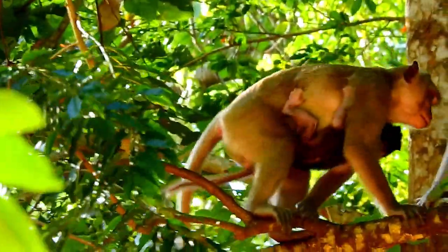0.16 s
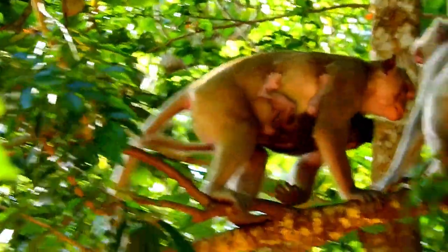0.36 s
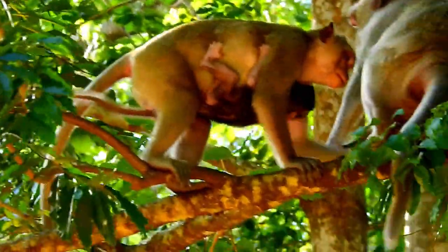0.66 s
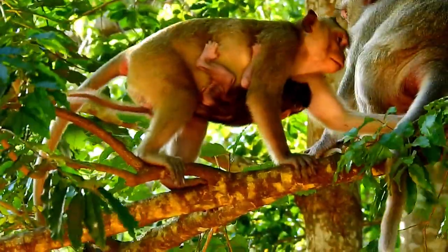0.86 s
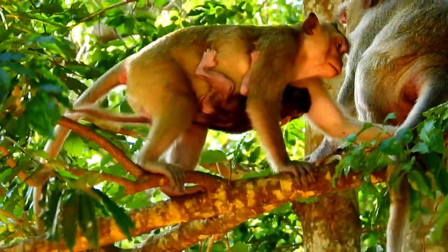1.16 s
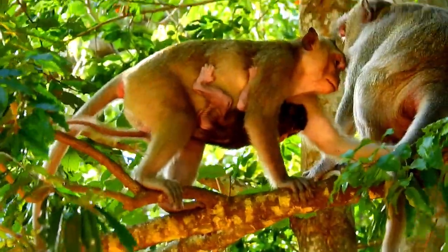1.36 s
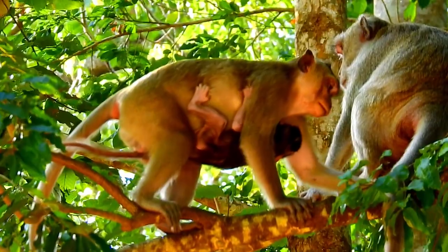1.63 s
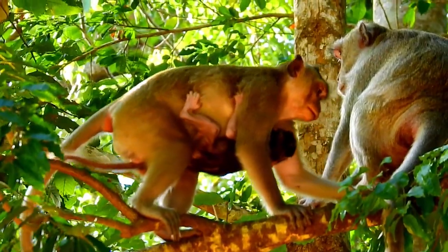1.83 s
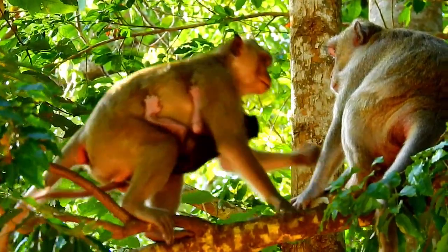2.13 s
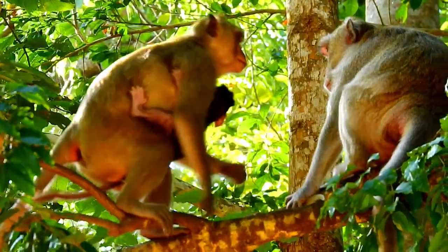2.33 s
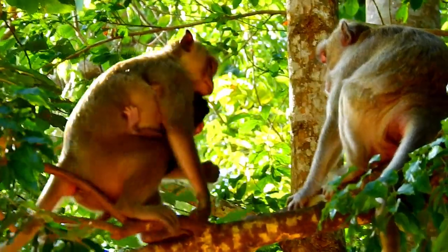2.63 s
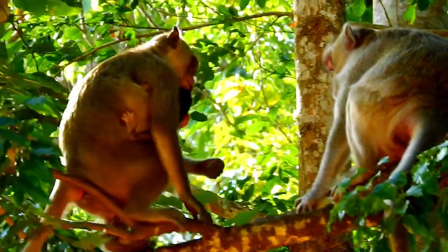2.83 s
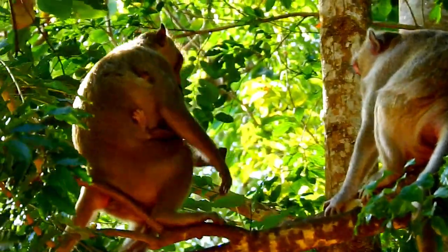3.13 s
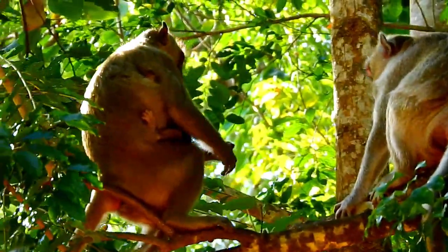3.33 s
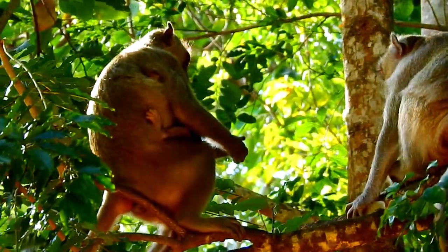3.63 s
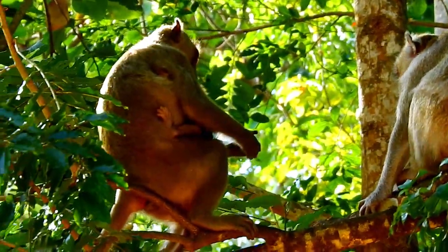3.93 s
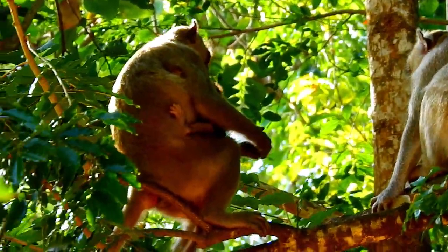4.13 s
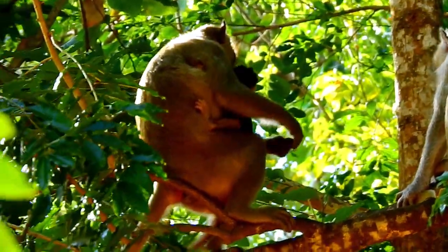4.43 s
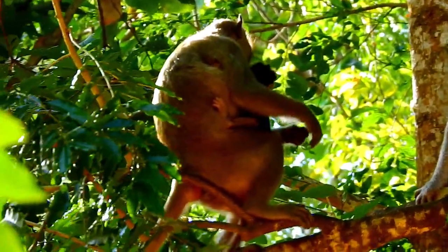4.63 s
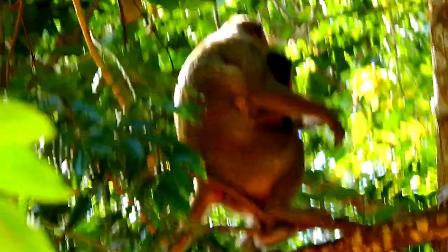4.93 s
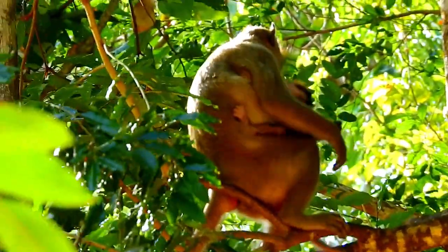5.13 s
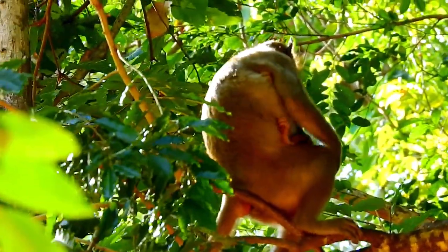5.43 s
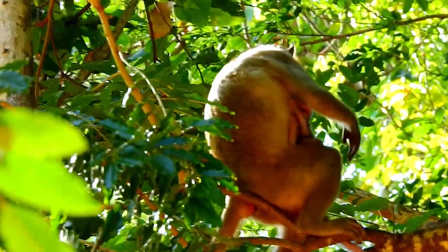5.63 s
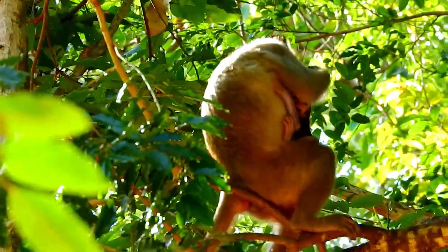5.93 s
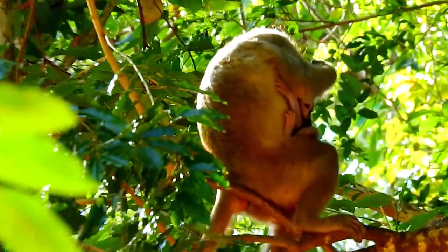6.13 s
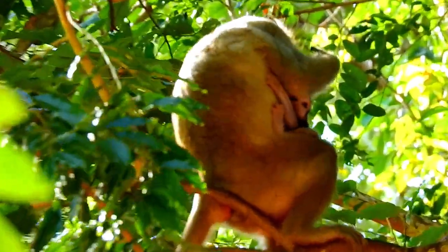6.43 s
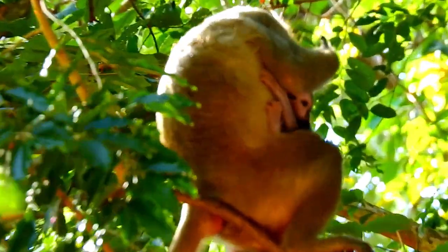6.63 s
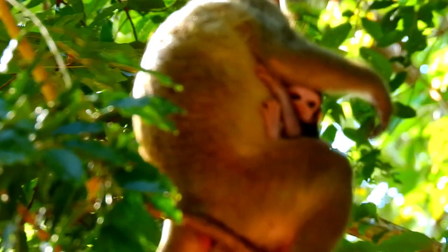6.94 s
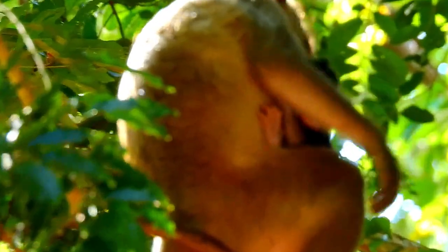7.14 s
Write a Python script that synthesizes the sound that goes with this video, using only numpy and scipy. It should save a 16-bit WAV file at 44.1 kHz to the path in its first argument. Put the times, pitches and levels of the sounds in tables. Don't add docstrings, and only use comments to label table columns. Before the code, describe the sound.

A distant camera microphone hears monkeys in tall trees, over faint airy hiss, occasional leaf rustle and soft ground thuds. Brief high whistles open the scene, with faint squeaks and a branch shake around 0.7 s. Near 1.1 s come sharper squeaks, then a rapid trill of seven rising chirps, fading by 1.65 s. Weak grumbling squeals follow; a crisp insect tick snaps at 2.15 s, and a hoarse squeal at 2.4 s. More ticks and thin whistles scatter from 2.7 to 3.7 s. Bright whistles cluster around 4 s, over a faint low coo, then squeaks at 4.3 s and a higher rising coo at 4.45 s. After a tick at 4.9 s, the nearest infant screams piercingly from 4.95 to 5.4 s, cracking and hissing, and again at 5.7 s. Calls then thin out, with low twig knocks at 6.2 and 6.3 s and gentle rustling. Fresh whistles close from 7.1 s. Every call leaves a short woody echo.

```python
import sys
import numpy as np
from scipy import signal
from scipy.fft import rfft, irfft
from scipy.io import wavfile
from scipy.ndimage import uniform_filter1d

SR = 44100
rng = np.random.default_rng(int(sys.argv[2]) if len(sys.argv) > 2 else 0)


def amp(db):
    return 10 ** (np.asarray(db, float) / 20)


def write(x):
    x = np.atleast_2d(x).T
    wavfile.write(sys.argv[1], SR, np.round(np.clip(x, -1, 1) * 32767).astype(np.int16))


N = 321048

# (time [s], roughness [0-1])
CRACKING = [(4.945, .11), (5.06, .05), (5.1, .3), (5.2, .33), (5.23, .25), (5.25, .03), (5.385, .04),
            (5.41, .25), (5.685, .2), (5.7, .03), (5.83, .1)]
# (multiple of the pitch [ratio], level [dB])
TROOP_PARTIALS = [(1, 0.5), (1.57, -43), (2.1, -54)]
CLEAN, WORN, HOARSE = .04, .17, .34


def evened(x):
    return x / np.sqrt(np.mean(x ** 2) + 1e-20)


def read(points, hz):
    f, value = np.transpose(points)
    return np.interp(np.log(hz + 1), np.log(f + 1), value)


def highpass(x, order, hz):
    return signal.sosfilt(signal.butter(order, hz, "high", fs=SR, output="sos"), x)


def add(mix, s, sound, pan_db):
    part = mix[:, round(s * SR):][:, :len(sound)]
    part += sound[:part.shape[1]] * amp(np.array([[pan_db / 2], [-pan_db / 2]]))


def wobble(count, width):
    bell = signal.windows.gaussian(int(8 * width), width)
    wander = evened(signal.fftconvolve(rng.standard_normal(count), bell, "same"))
    return evened(np.tanh(wander))


def squeal(rows, partials):
    s, *columns = np.transpose(rows)
    t = np.arange(s[0], s[-1], 1 / SR)
    hz, level_db, rough = (uniform_filter1d(np.interp(t, s, c), 130) for c in columns)
    rough = np.clip(rough, 0, 1)
    quaver = .25 * rough * wobble(len(t), width=22)
    scatter = 0.526 * rough ** 2 * wobble(len(t), width=4.2)
    turns = np.cumsum(hz * (1 + quaver + scatter)) / SR
    tone = 0
    for k, db in partials:
        audible = np.clip((19000 - k * hz) / 2000, 0, 1)
        tone = tone + amp(db) * np.sin(2 * np.pi * k * turns) * audible
    flutter_db = (2.5 + 3 * rough) * wobble(len(t), width=60)
    from_ends = np.minimum(t - t[0], t[-1] - t)
    edge = np.sin(np.pi / 2 * np.clip(from_ends / .008, 0, 1)) ** 2
    return np.sqrt(2) * amp(level_db + flutter_db) * tone * edge


def call(start, length, db, first_hz, last_hz, kind):
    peak, glide, onset_db, ending_db, rough = kind
    if rough == WORN:
        db = db + 3
    peak_s = start + np.clip(peak, .05, .95) * length
    peak_hz = first_hz + glide * (last_hz - first_hz)
    return [(start, first_hz, db + onset_db, rough),
            (peak_s, peak_hz, db, rough),
            (start + length, last_hz, db + ending_db, rough + .1)]


def infant_screams():
    # (time [s], pitch [Hz], level [dB])
    arches = [
        [(4.948, 2315, -38), (4.972, 4437, -27.5), (4.988, 6530, -21.5), (5.008, 8610, -33),
         (5.05, 9400, -37.5), (5.09, 8880, -39), (5.13, 7500, -30.5), (5.17, 7440, -30), (5.205, 6370, -18.5)],
        [(5.195, 6256, -16.5), (5.236, 5600, -18), (5.256, 6820, -20.5), (5.276, 6970, -17.5),
         (5.297, 8350, -35), (5.352, 8630, -34.5), (5.372, 9330, -32), (5.398, 8000, -25.5), (5.416, 5530, -23)],
        [(5.682, 6200, -36), (5.693, 8310, -20.5), (5.705, 8880, -19.5), (5.727, 9650, -26.5),
         (5.752, 8400, -33), (5.763, 6890, -18), (5.78, 5880, -26), (5.81, 5286, -24.5), (5.838, 4400, -23)],
    ]
    overtones = [-44, -42, -24]
    # (start [s], length [s], peak level [dB], first pitch [Hz], last pitch [Hz])
    breaks = [(4.963, 0.02, -22.5, 3600, 5400), (5.19, 0.03, -26, 3800, 4000),
              (5.398, 0.026, -22, 3450, 5320), (5.683, .1, -33.5, 5650, 5800),
              (5.714, .018, -36, 5500, 4800), (5.815, .025, -32, 7300, 7200), (5.01, .09, -38, 8000, 8000),
              (5.1, .09, -49.5, 11000, 12000), (5.165, .02, -27, 8100, 7100),
              (5.687, 0.03, -22.5, 7400, 6600), (5.765, 0.03, -27, 7700, 6500),
              (5.783, 0.028, -23.5, 6700, 6100), (5.816, 0.022, -27, 3850, 3750),
              (5.0, .15, -32.5, 6500, 6550), (4.99, .14, -36.5, 4450, 4350), (5.03, .12, -37.5, 5600, 6100),
              (5.25, 0.2, -31, 5600, 5550), (5.2, .04, -34, 4000, 3800), (4.95, 0.024, -36.5, 3700, 3300),
              (4.945, .025, -42, 2000, 2900), (4.96, .09, -50, 2900, 2600), (4.96, .1, -55, 2150, 2100),
              (5.405, 0.02, -22, 4300, 4500), (4.968, .018, -22, 4350, 4500),
              (5.69, .065, -47, 12300, 13200), (5.688, .02, -40, 10200, 10800),
              (5.775, .04, -46, 11800, 11500), (5.72, .05, -37.5, 7000, 7000)]
    # (peak position [share of length], glide done by then [share],
    # onset level [dB], ending level [dB], roughness [0-1])
    break_kind = (.45, .5, -8, -12, .15)
    # (multiple of the pitch [ratio], level [dB])
    break_partials = [(1, 0), (2, -40)]
    near = np.zeros((2, N))
    for arch, overtone_db in zip(arches, overtones):
        rows = [(*row, np.interp(row[0], *np.transpose(CRACKING))) for row in arch]
        add(near, rows[0][0], squeal(rows, [(1, 0.00074), (2, overtone_db)]), .3)
    for row in breaks:
        add(near, row[0], squeal(call(*row, break_kind), break_partials), .3)
    return near


def rasp(whistle, db):
    # (frequency [Hz], level [dB])
    throat = [(2000, -40), (3700, -32), (4400, -8), (5000, -10), (6300, 0.5), (9000, -13), (11000, -17),
              (15500, -37)]
    strength = np.sqrt(np.abs(uniform_filter1d(whistle ** 2, 350)))
    colour = amp(read(throat, np.fft.rfftfreq(N, 1 / SR)))
    rush = evened(irfft(rfft(rng.standard_normal(N)) * colour, N))
    return amp(db + 3.5 * wobble(N, width=250)) * strength * rush


def leaking_air(near, hoarse):
    cracked = .07 + 3.5 * np.interp(np.arange(N) / SR, *np.transpose(CRACKING))
    return rasp(highpass(cracked * near + amp(-0.5) * hoarse, 2, 5000), db=-7.0)


def troop_whistles():
    # (start [s], length [s], peak level [dB], first pitch [Hz], last pitch [Hz])
    stabs = [(.475, 0.051, -80.5, 11300, 10970), (.71, .17, -81, 10540, 11070),
             (0.589, .08, -61.5, 6770, 6120), (6.114, 0.12, -45.5, 7930, 7914),
             (0, 0.065, -45.5, 7430, 7350), (0.868, 0.13, -52, 6850, 6890), (3.672, .012, -45, 7900, 7800),
             (2.438, .03, -34, 6300, 6600), (1.15, 0.031, -35, 6400, 6300),
             (1.172, 0.062, -39.5, 6300, 6200), (4.051, 0.13, -43.5, 6920, 7010),
             (4.314, 0.058, -50, 3920, 3540), (4.36, 0.034, -34.5, 2560, 2480),
             (7.123, .02, -42, 6500, 7100), (7.136, 0.15, -38, 7150, 7380)]
    # (start [s], length [s], peak level [dB], first pitch [Hz], last pitch [Hz])
    swells = [(2.947, 0.066, -38, 7280, 6760), (3.193, .12, -38, 6970, 6000),
              (3.977, 0.039, -27.5, 7960, 6790), (4.005, 0.045, -28, 6780, 7160),
              (4.045, 0.0203, -48, 7200, 8010), (4.31, 0.058, -37, 2260, 3370),
              (4.537, 0.11, -45.5, 6730, 7330), (6.091, 0.052, -45.5, 6790, 7900),
              (7.087, 0.081, -37.5, 6735, 5910)]
    # (start [s], length [s], peak level [dB], first pitch [Hz], last pitch [Hz])
    builds = [(1.099, 0.041, -42.5, 4830, 6120), (2.955, 0.06, -55.5, 8700, 7420),
              (3.965, 0.021, -35, 6550, 7950), (4.339, 0.032, -33, 1997, 2364),
              (4.815, .1, -34, 6830, 5720), (6.143, 0.048, -53.5, 2600, 1876),
              (6.317, 0.055, -52.5, 7750, 5990)]
    # (start [s], length [s], peak level [dB], first pitch [Hz], last pitch [Hz])
    dives = [(0.035, 0.023, -40.5, 7730, 5240), (0.752, 0.047, -45.5, 6660, 5170),
             (1.04, 0.035, -45, 7200, 4000), (1.616, 0.059, -49.5, 6970, 4910),
             (1.674, .04, -51.5, 4630, 3490), (6.702, .08, -58.5, 6330, 4950)]
    # (start [s], length [s], peak level [dB], first pitch [Hz], last pitch [Hz])
    cries = [(0, 0.077, -55.5, 8230, 8330), (1.513, 0.021, -62.5, 2450, 2390),
             (1.578, 0.093, -71, 2256, 2100), (1.709, 0.037, -62, 2346, 2390),
             (3.677, 0.044, -57.5, 3630, 3520), (2.441, 0.095, -40, 6470, 6360),
             (0, 0.027, -62.5, 2005, 1880), (0, 0.024, -65, 4420, 4300), (0.511, 0.073, -68, 4120, 5090),
             (0.531, 0.18, -64, 6540, 5910), (0.866, 0.13, -68.5, 8060, 8520),
             (1.825, 0.15, -45.5, 7050, 6690), (1.97, 0.14, -59.5, 6620, 6670),
             (2.427, 0.06, -51, 3800, 4050), (2.601, 0.14, -48, 7510, 7900), (1.136, .02, -47, 6180, 6500),
             (3.262, 0.081, -51, 6100, 5310), (3.315, 0.12, -43.5, 5490, 6190),
             (3.385, 0.15, -41, 6250, 7350), (4.085, 0.097, -55.5, 5430, 5310),
             (4.356, 0.071, -45.5, 4414, 4390), (4.358, .08, -46, 5360, 5016),
             (4.568, 0.15, -62.5, 8220, 7780), (5.97, 0.94, -68.5, 891, 954.7),
             (6.201, 0.85, -71.5, 6430, 5940), (6.741, .1, -63.5, 5680, 5415), (6.2, .5, -74, 2550, 2400),
             (6.7, .5, -70, 2450, 3000), (6.12, .2, -62, 7000, 7200), (7.149, 0.093, -57.5, 8280, 7800),
             (7.156, 0.14, -43, 6090, 5800)]
    # (start [s], length [s], peak level [dB], first pitch [Hz], last pitch [Hz])
    grumbles = [(1.698, 0.14, -60.5, 6580, 6860), (1.847, .14, -53.5, 6330, 6120),
                (2.159, .12, -57.5, 6800, 6500), (2.3, 0.14, -62.5, 6520, 6760),
                (3.399, .16, -54, 5930, 6320), (2.87, 0.137, -58, 2900, 2746),
                (3.161, .14, -61, 2904, 2900), (2.5, .2, -52, 4700, 4500), (0, .1, -68, 11300, 11500),
                (3.9, .2, -63, 2310, 2395)]
    # (start [s], length [s], peak level [dB], first pitch [Hz], last pitch [Hz])
    screeches = [(.94, 0.072, -75, 11020, 10970), (1.894, 0.035, -76, 8100, 8300),
                 (1.953, 0.38, -69.5, 5140, 5150), (2.1, 0.037, -53.5, 7000, 6100),
                 (2.394, 0.051, -47.5, 6980, 6800), (2.428, 0.075, -29, 6786, 6490),
                 (2.488, .2, -40, 6270, 5674), (3.098, 0.053, -52, 8340, 8220),
                 (3.378, 0.14, -52.5, 4750, 4880), (3.686, 0.067, -43.5, 8180, 7470),
                 (4.314, 0.1, -66.5, 9320, 8850)]
    # (peak position [share of length], glide done by then [share],
    # onset level [dB], ending level [dB], roughness [0-1])
    stab_kind = (0.47, 0.57, 0.12, -11, CLEAN)
    swell_kind = (0.7, 0.88, -15, -23, CLEAN)
    build_kind = (0.99, 0.94, -13.5, -1.5, CLEAN)
    dive_kind = (0.27, 0.1905, -16, -15, WORN)
    cry_kind = (0.55, 0.69, -5.5, -7, WORN)
    grumble_kind = (.4, .5, -5, -6, .23)
    screech_kind = (0.35, 0.31, -11.5, -11.5, HOARSE)
    # (time [s], left minus right [dB])
    caller_side = [(0.0, 4), (0.36, 11), (0.47, -10.5), (1.05, 24.5), (1.151, -17), (2.051, 11),
                   (5.961, -2), (6.489, 23), (7.28, 3.5)]
    far, hoarse = np.zeros((2, 2, N))
    for mix, rows, kind in [(far, stabs, stab_kind), (far, swells, swell_kind), (far, builds, build_kind),
                            (far, dives, dive_kind), (far, cries, cry_kind), (far, grumbles, grumble_kind),
                            (hoarse, screeches, screech_kind)]:
        for row in rows:
            side_db = np.interp(row[0], *np.transpose(caller_side))
            add(mix, row[0], squeal(call(*row, kind), TROOP_PARTIALS), side_db)
    return far, hoarse


def chirp(s, db, hz):
    # (time from the chirp's listed time [s], pitch factor, level [dB])
    shape = [(-.012, .76, -17), (0, .9, -6), (.01, 1.0, 0), (.019, 1.0, -7), (.028, .95, -18)]
    rows = [(s + dt, factor * hz, db + rel_db, .055) for dt, factor, rel_db in shape]
    return squeal(rows, TROOP_PARTIALS[:1])


def trill():
    # (time [s], level [dB], top pitch [Hz])
    chirps = [
        (1.2457, -35.5, 5530),
        (1.33, -42, 5504),
        (1.404, -42, 5246),
        (1.4696, -45.5, 5220),
        (1.5277, -42.5, 5280),
        (1.59, -42, 4870),
        (1.644, -48.5, 5100),
    ]
    sung = np.zeros((2, N))
    for s, db, hz in chirps:
        add(sung, s - .012, chirp(s, db, hz), 0)
    return sung


def coo(rows, mouth):
    s, hz, level_db = np.transpose(rows)
    t = np.arange(s[0], s[-1], 1 / SR)
    turns = np.cumsum(np.interp(t, s, hz) * (1 + 0.009 * wobble(len(t), width=200))) / SR
    voice = 0
    for k in range(1, 9):
        partial_db = read(mouth, k * hz.mean()) + 6 * wobble(len(t), width=200)
        voice = voice + amp(partial_db) * np.sin(2 * np.pi * k * turns)
    return amp(np.interp(t, s, level_db)) * evened(voice) * signal.windows.tukey(len(t), .1)


def soft_coos():
    # (time [s], pitch [Hz], level [dB])
    coo_lines = [
        [(3.86, 647, -57), (3.98, 639.5, -54.5), (4.12, 629, -55), (4.25, 632.5, -62)],
        [(4.43, 1410, -45.5), (4.51, 1436, -47.5), (4.67, 1509, -48.5), (4.79, 1530, -56)],
    ]
    # (frequency [Hz], level [dB])
    nasal_mouth = [(640, -50), (1300, -18), (1900, -3), (2550, 0), (3200, -2), (3850, -15), (4500, -11),
                   (5500, -40)]
    # (frequency [Hz], level [dB])
    round_mouth = [(900, 21), (1450, -9.5), (1900, 22), (2900, -12.5), (4400, -31), (6000, -61)]
    sung = np.zeros((2, N))
    for rows, mouth in zip(coo_lines, [nasal_mouth, round_mouth]):
        add(sung, rows[0][0], coo(rows, mouth), 0)
    return sung


def click(db, hz, t60, partners):
    t = np.arange(1500) / SR
    modes = [(0.97, 0.0018)] + partners
    ring = sum(amp(p_db) * np.sin(2 * np.pi * hz * ratio * t) for ratio, p_db in modes)
    return amp(db - 60 * t / t60) * ring * np.minimum(t / .0012, 1)


def ticks_and_knocks():
    # (time [s], peak level [dB], pitch [Hz])
    ticks = [(0.0213, -33, 7300), (0.286, -40, 6700), (0.3894, -55, 5950), (2.0767, -36, 6230),
             (2.1532, -17, 6500), (2.4106, -25, 6570), (2.728, -21, 7000), (3.0465, -27, 6870),
             (3.3603, -24, 6200), (3.059, -40, 6870), (3.8752, -21, 6370), (4.474, -47, 8600),
             (4.8944, -22, 6120), (2.196, -46, 6600), (2.142, -52, 4300), (2.418, -38, 6800),
             (4.795, -53, 7400)]
    # (time [s], peak level [dB], pitch [Hz])
    knocks = [(1.217, -51, 1050), (2.644, -58, 3000), (2.186, -56, 1730), (2.186, -58, 2800),
              (2.43, -53, 2000), (2.061, -45, 1000), (3.431, -49, 1016), (4.694, -44.5, 1770),
              (4.756, -41.5, 1345), (4.884, -44.5, 1980), (5.661, -39, 1070), (6.209, -31.5, 1276),
              (6.327, -35, 1120), (6.712, -43.5, 1056), (7.209, -40, 2030)]
    tick_modes = [(.68, -14), (1.15, -6.5), (1.35, -15), (1.55, -20), (1.75, -28), (1.95, -26)]
    knock_modes = [(.75, -6), (1.3, -4), (1.7, -7)]
    clicks = np.zeros((2, N))
    for s, db, hz in ticks:
        add(clicks, s, click(db - 1.5, hz, 0.0064, tick_modes), 5.0)
    for s, db, hz in knocks:
        add(clicks, s, click(db, hz, .026, knock_modes), 1.5)
    return clicks


def echo_tail(early_db):
    # (frequency [Hz], likeness [0-1])
    echo_same = [(1000, 0.94), (3000, 0.91), (5000, 0.52), (12000, 0.086)]
    # (frequency [Hz], time to fade by 60 dB [s])
    wood = [(1000, 0.45), (3500, 0.39), (6000, 0.46), (9000, 0.38), (14000, 0.33)]
    taps = np.zeros((2, SR))
    slots = np.arange(150, SR - 20, 20)
    at = slots + rng.integers(0, 20, (2, len(slots)))
    np.put_along_axis(taps, at, rng.choice([-1., 1.], at.shape), 1)
    hz, t, (left, other) = signal.stft(taps, SR, nperseg=256)
    same = np.clip(read(echo_same, hz), -1, 1)[:, None]
    right = same * left + np.sqrt(1 - same ** 2) * other
    decay = amp(-60 * t / read(wood, hz)[:, None]) * (1 + amp(early_db - 60 * t / .15))
    tail = signal.istft(np.array([left, right]) * decay, SR, nperseg=256)[1][:, :SR // 2]
    return tail / np.linalg.norm(tail[0])


def trunks(x, early_db):
    sway = 2 * np.pi * 16 * np.arange(N) / SR
    echoes = 0
    for wave in (np.sin, np.cos):
        sent = (x.mean(0) * wave(sway))[None]
        echoes = echoes + signal.fftconvolve(sent, echo_tail(early_db), axes=1)[:, :N]
    return echoes


def stirred(events, layer):
    calm_db, rise, fall = layer
    t = np.arange(0, N / SR + .02, .005)
    lift = 0
    for s, hold, db in events:
        before, after = np.maximum(s - t, 0), np.maximum(t - s - hold, 0)
        lift = lift + amp(db - rise * before - fall * after)
    return np.transpose([t, 20 * np.log10(amp(calm_db) + lift)])


def hiss(spectrum, curve, patchy_db, size=512):
    # (frequency [Hz], likeness [0-1])
    likeness = [(300, 0.97), (800, 0.84), (2400, 0.89), (4400, 0.13), (8000, 0.23)]
    frames, hz = 4 * N // size + 5, np.fft.rfftfreq(size, 1 / SR)
    a, b, c, d, patches = rng.standard_normal((frames, len(hz), 5)).T
    patches = evened(uniform_filter1d(uniform_filter1d(patches, 5, 0), 14, 1))
    same = np.clip(read(likeness, hz), -1, 1)[:, None]
    left = a + 1j * b
    right = same * left + np.sqrt(1 - same ** 2) * (c + 1j * d)
    z = np.array([left, right]) * amp(read(spectrum, hz)[:, None] + patchy_db * patches)
    sound = evened(signal.istft(z, nperseg=size, noverlap=3 * size // 4)[1][:, :N])
    return sound * amp(np.interp(np.arange(N) / SR, *np.transpose(curve)))


def shaken_branches():
    # (frequency [Hz], level per Hz [dB])
    leaves = [(410, -29), (700, -13.5), (989, -11), (1080, -6.5), (1540, -3), (2270, 4.5), (2980, 3),
              (4100, -5), (5000, -13.5), (6500, -42), (11000, -120)]
    # (start [s], hold [s], level [dB])
    shakes = [(.68, 0.25, -51), (1.65, 0.44, -74.5), (2.88, 0.37, -53), (3.9, 0.13, -53),
              (4.35, 0.5, -63.5), (5.19, 0.15, -48.5), (5.6, 0.47, -77), (6.1, 0.8, -69), (7.1, .2, -62.5)]
    # (calm level [dB], rise [dB per s], fall [dB per s])
    branch = (-86, 272, 70)
    return hiss(leaves, stirred(shakes, branch), patchy_db=2.5)


def stirred_undergrowth():
    # (frequency [Hz], level per Hz [dB])
    undergrowth = [(210, -49), (350, -18), (451, -30.5), (604, -13), (841, -12), (937, -9), (2200, -23.5),
                   (2860, -45.5), (4840, -120)]
    # (start [s], hold [s], level [dB])
    stirs = [(.7, 0.5, -80), (1.62, 0.5, -70), (2.5, .2, -75), (2.9, .6, -73), (3.9, .25, -70.5),
             (4.4, .45, -75), (5.15, .45, -72), (5.98, 0.85, -62.5), (7.2, 0.11, -62)]
    # (calm level [dB], rise [dB per s], fall [dB per s])
    brush = (-91, 150, 54)
    return hiss(undergrowth, stirred(stirs, brush), patchy_db=5.0)


def ground_thuds():
    # (frequency [Hz], level per Hz [dB])
    rumble = [(24, -54.5), (38, -14), (50, -3.5), (107, 2.5), (193, -3), (262, -10.5), (357, -11.5),
              (400, -14.5), (500, -20), (650, -19), (1100, -120)]
    # (start [s], hold [s], level [dB])
    thuds = [(0, 0.015, -66.5), (.66, 0.17, -62.5), (1.5, 0.082, -76), (1.93, 0.07, -52.5),
             (3.77, 0.059, -55), (6.0, 0.48, -75), (6.62, 0.25, -63.5)]
    # (calm level [dB], rise [dB per s], fall [dB per s])
    ground = (-70.5, 620, 89)
    return hiss(rumble, stirred(thuds, ground), patchy_db=2.0, size=4096)


def forest_air():
    # (frequency [Hz], level per Hz [dB])
    air = [(240, -43.5), (400, -8.5), (1100, -8), (1600, -9.5), (3460, -56), (4300, -24), (6380, -2.5),
           (7330, -3), (9080, -26), (14600, -22.5), (15500, -28.5)]
    return hiss(air, [(0, -77.5), (7.28, -77.5)], patchy_db=3.5)


def scene():
    near = infant_screams()
    far, hoarse = troop_whistles()
    far = far + trill() + soft_coos()
    clicks = ticks_and_knocks()
    near = highpass(near + leaking_air(near, hoarse), 2, 2000)
    far = far + highpass(hoarse, 6, 4500)
    echoes = amp(-2) * trunks(far + amp(-4) * clicks, early_db=5)
    echoes += amp(-3.5) * trunks(near, early_db=7.0)
    bed = shaken_branches() + stirred_undergrowth() + ground_thuds() + forest_air()
    return amp(-5.5) * far + amp(-3) * near + clicks + echoes + bed


def masked(x):
    hz, _, z = signal.stft(x, SR, nperseg=1024, noverlap=512)
    power = uniform_filter1d((abs(z) ** 2).mean(0), size=3, axis=1)
    band_db = 10 * np.log10(abs(power[:512]).reshape(32, 16, -1).mean(1) + 1e-20)
    slope_db = 1.7 * np.arange(32)[:, None]
    loudest_below = np.maximum.accumulate(band_db + slope_db, axis=0) - slope_db
    hidden = band_db < loudest_below - 37
    kept = 1 - np.repeat(hidden, 16, axis=0) * (hz[:512, None] > 7000)
    kept = np.vstack([kept, kept[-1:]])
    return signal.istft(z * kept, SR, nperseg=1024, noverlap=512)[1][:, :N]


def top_cut(x):
    return signal.sosfilt(signal.butter(12, 15660, fs=SR, output="sos"), x)


def record(dry):
    lowpass = signal.firwin(255, 15600, window=("kaiser", 9), fs=SR)
    limited = signal.oaconvolve(dry, lowpass[None], "same")
    return top_cut(masked(limited))


dry = scene()
out = record(dry)
write(out)
```